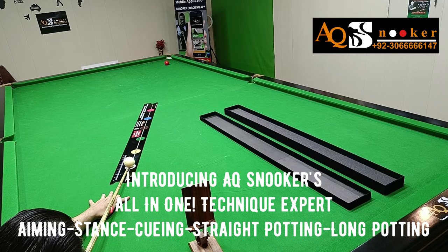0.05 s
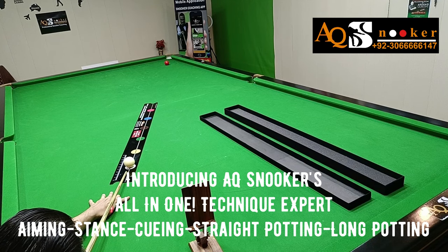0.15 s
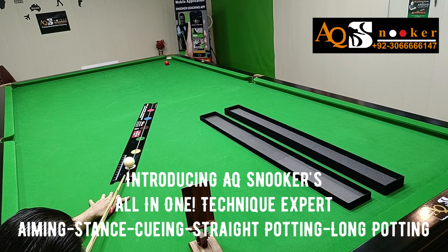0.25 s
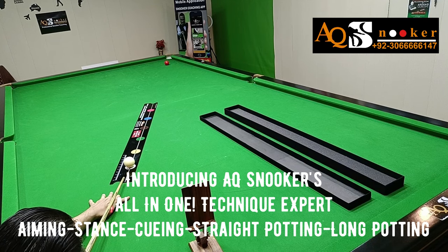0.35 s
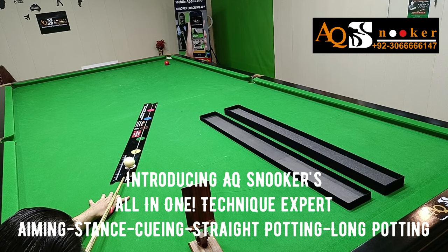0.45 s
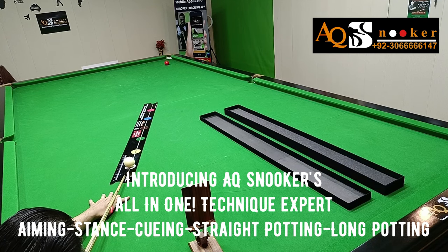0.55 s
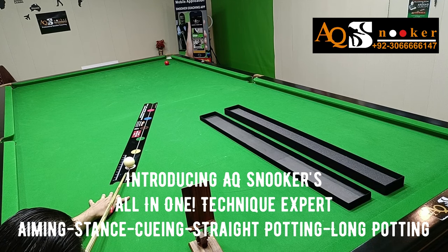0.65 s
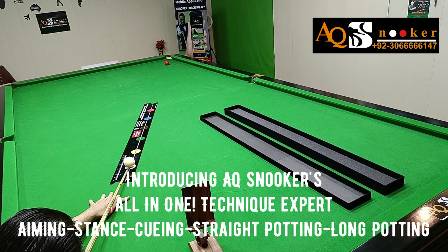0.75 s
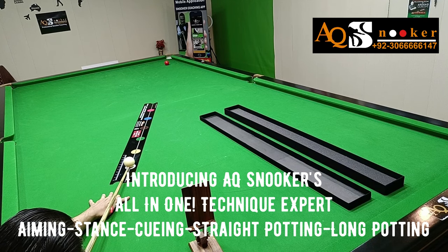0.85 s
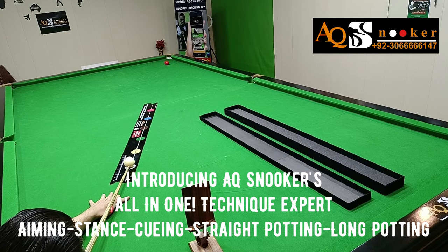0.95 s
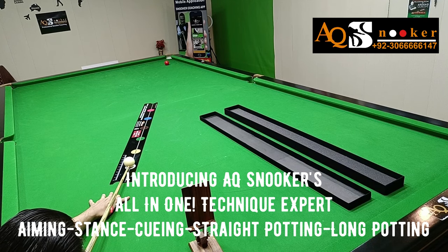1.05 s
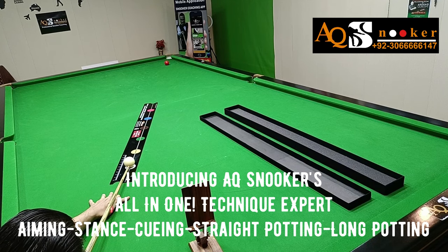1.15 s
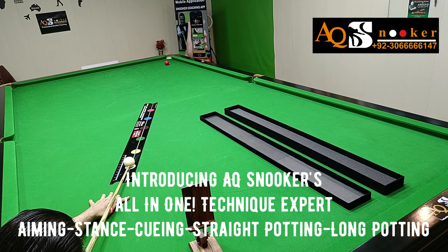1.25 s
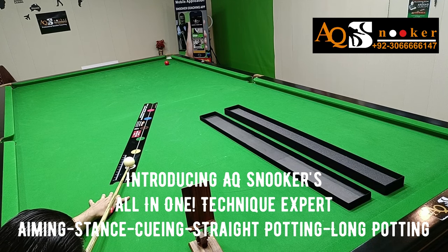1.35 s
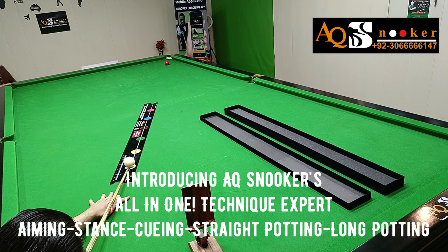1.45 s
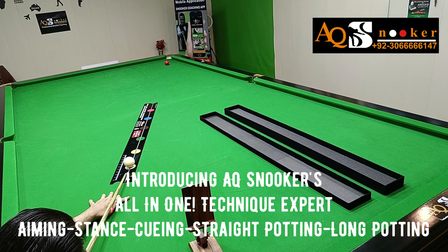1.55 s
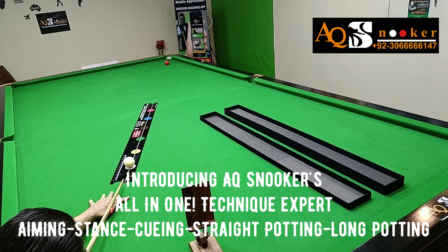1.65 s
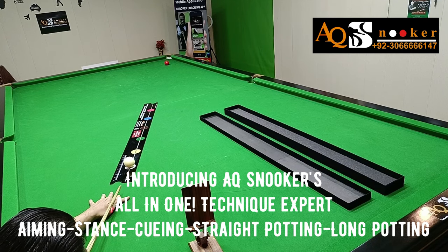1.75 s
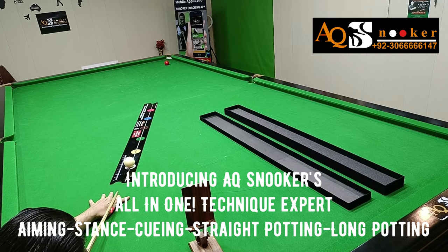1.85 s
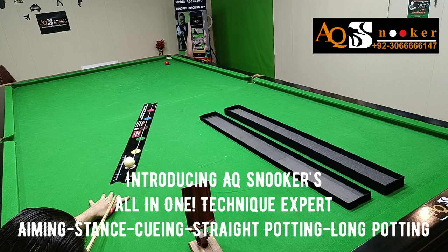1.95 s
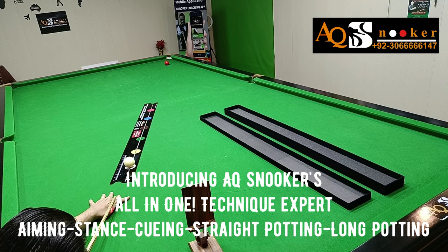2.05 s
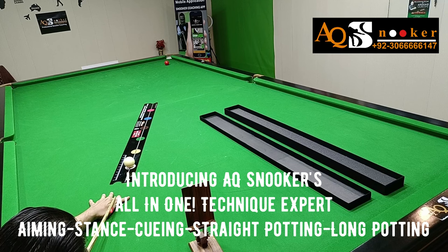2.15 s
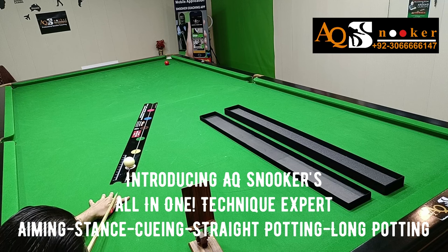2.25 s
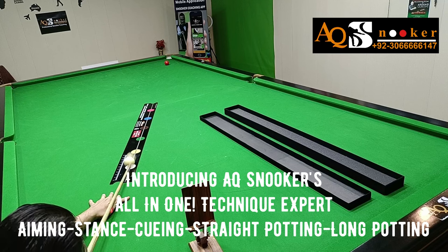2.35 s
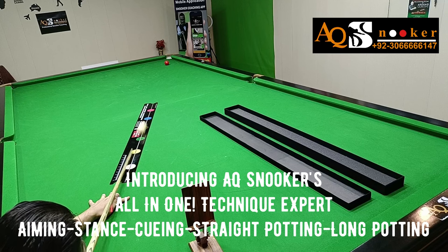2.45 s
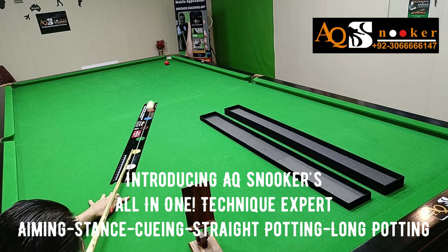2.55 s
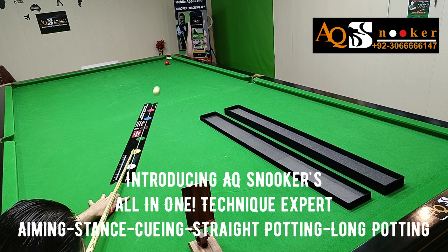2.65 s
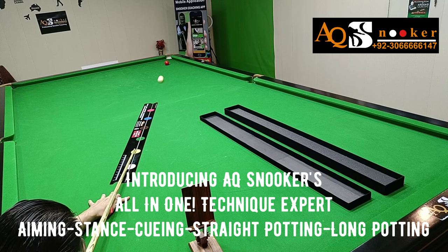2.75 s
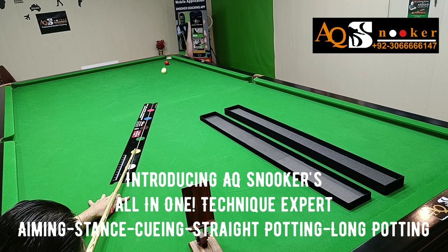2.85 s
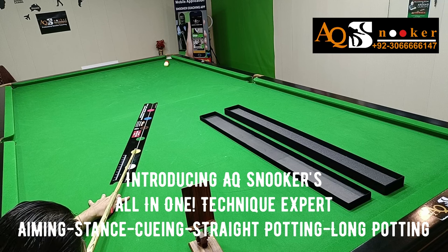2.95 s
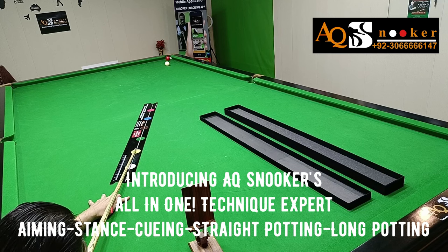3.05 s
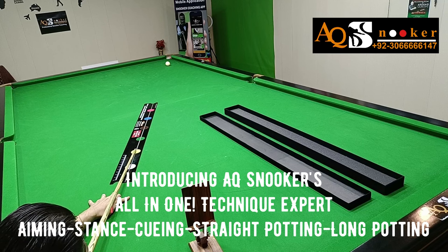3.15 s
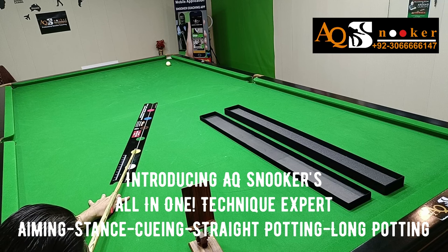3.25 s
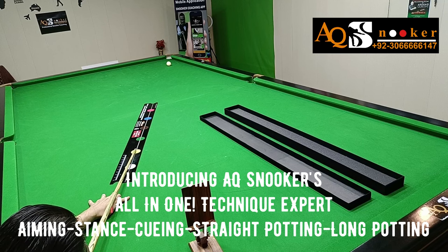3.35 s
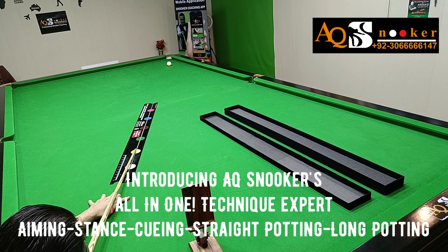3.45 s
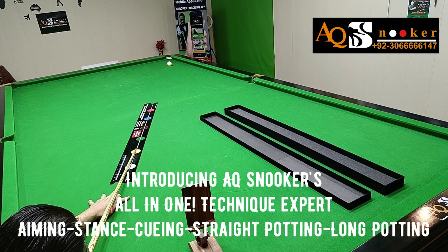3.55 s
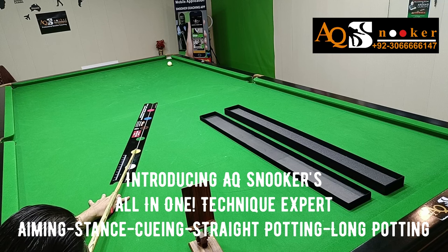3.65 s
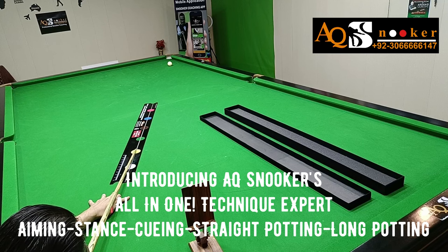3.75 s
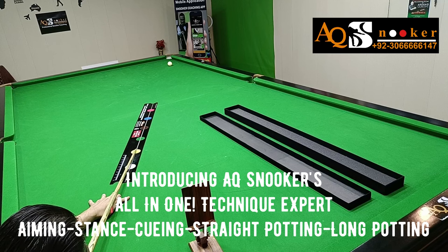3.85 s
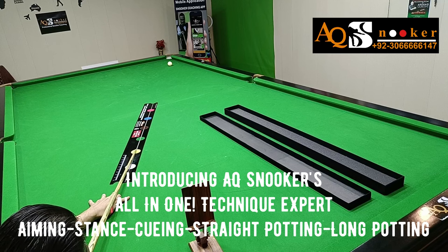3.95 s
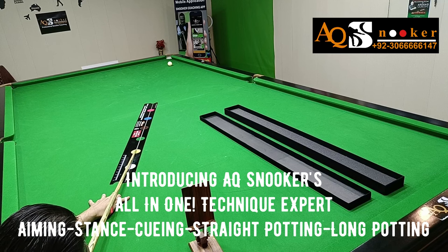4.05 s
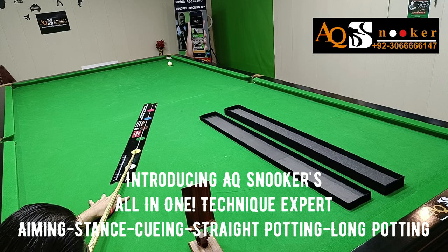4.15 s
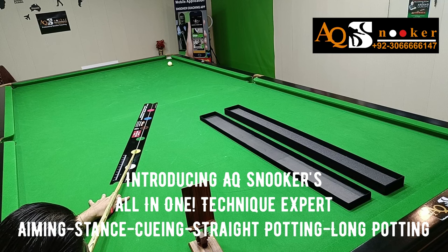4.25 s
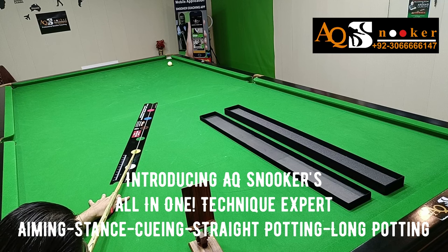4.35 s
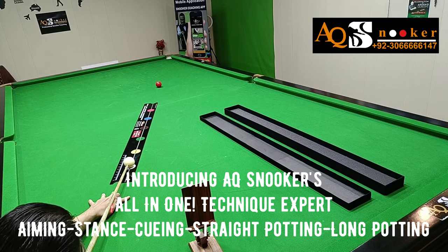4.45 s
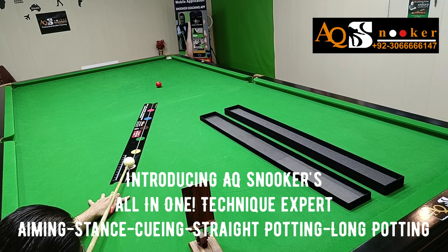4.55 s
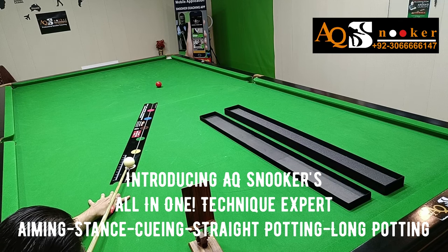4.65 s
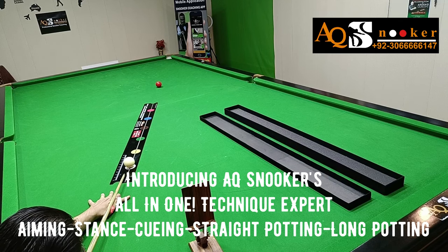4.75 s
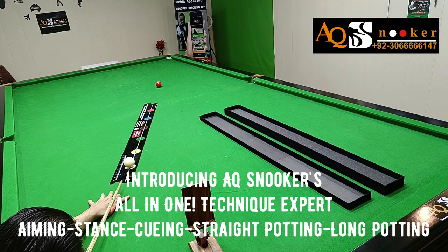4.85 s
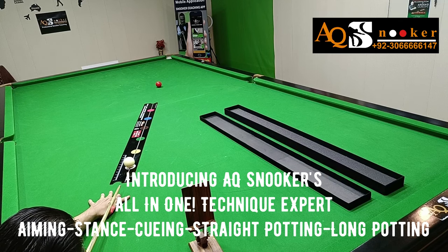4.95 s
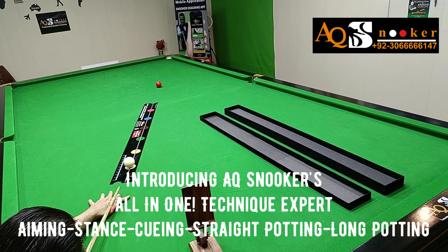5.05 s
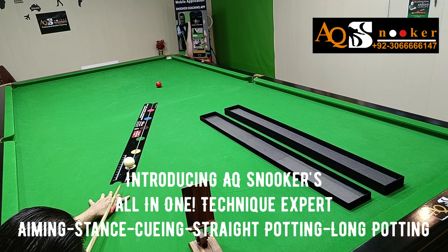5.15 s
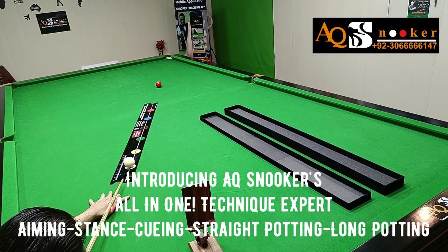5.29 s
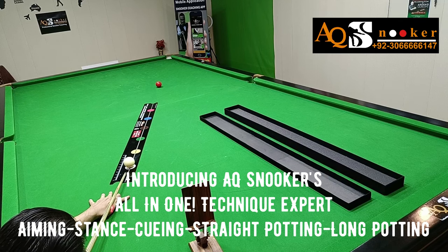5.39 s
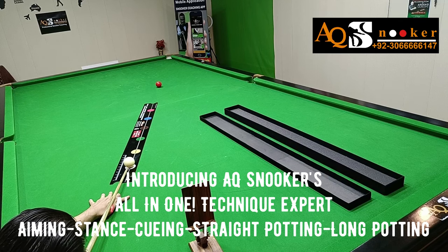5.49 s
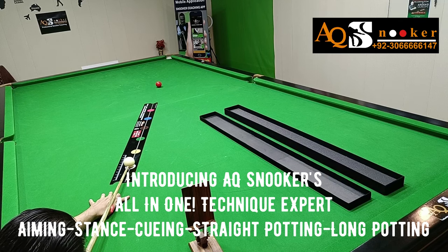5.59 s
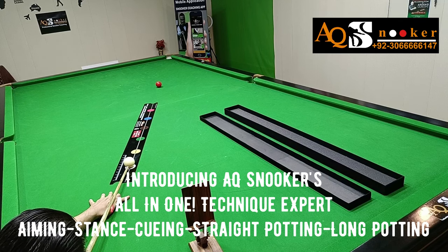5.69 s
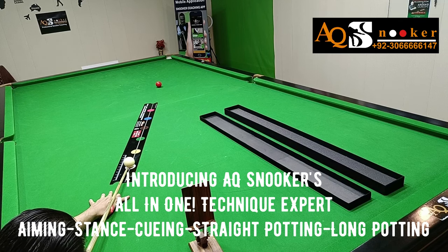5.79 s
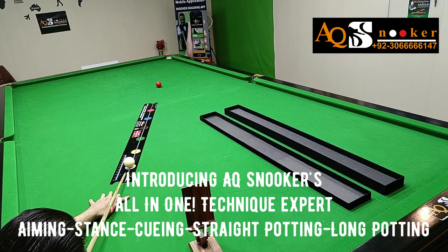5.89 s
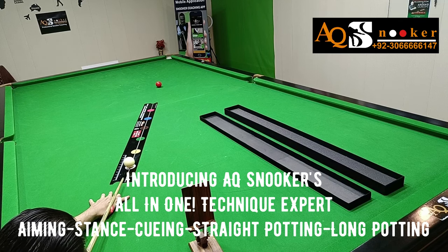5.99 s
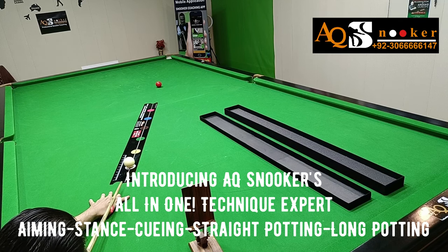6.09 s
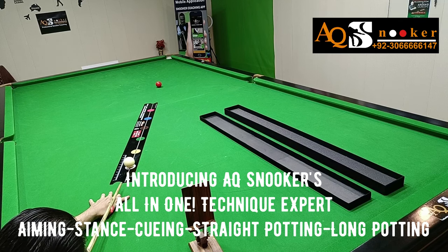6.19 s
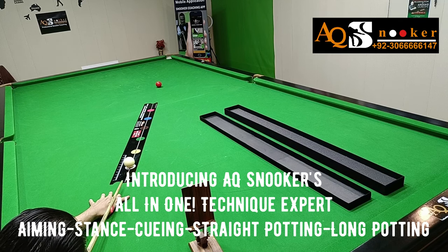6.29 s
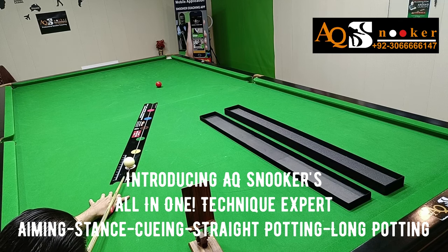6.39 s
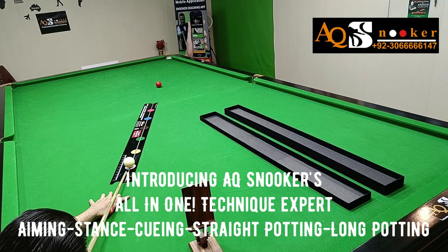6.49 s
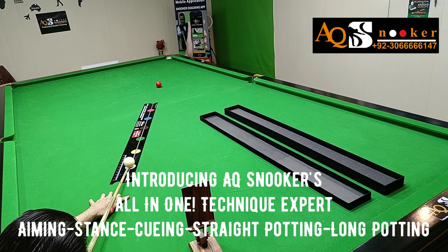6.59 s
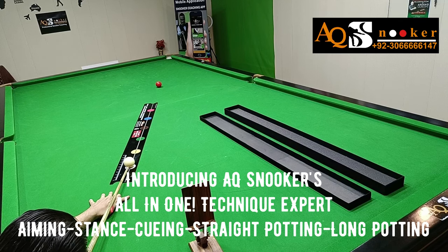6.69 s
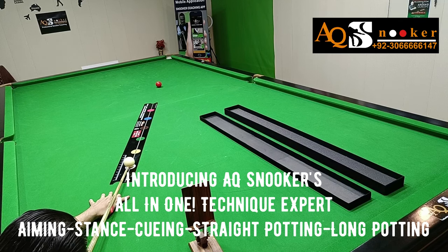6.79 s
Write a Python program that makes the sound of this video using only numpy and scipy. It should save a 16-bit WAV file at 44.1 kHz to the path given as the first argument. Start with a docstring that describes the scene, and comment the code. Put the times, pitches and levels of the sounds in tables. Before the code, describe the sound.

Steady ventilation rush and a wavering low hum fill a medium indoor room. After about two and a half seconds a cue tip cracks sharply on a ball, with a short soft sliding friction. Half a second later two balls meet with a hard bright clack, and the potted ball knocks rapidly in the pocket, growing duller. A small bright rustle, a very faint clack and tiny ticks follow. Stereo microphone close to the player.

```python
"""A cue strikes the white ball on a snooker table; it clacks against a far ball, which thuds into a pocket.
Blows are short shaped pulses plus dying modes, with early echoes and a room tail of sparse taps.
The cue's slide and a bright rustle are shaped noise; a few faint ticks follow.
Behind lie the ventilation's noise and a narrow band of low room noise near 90 Hz, made as a sine fluctuating
in level and pitch; two ports a few centimetres apart, with a limiter."""
import sys
import numpy as np
from scipy import signal
from scipy.fft import rfft, irfft
from scipy.io import wavfile
from scipy.ndimage import uniform_filter1d, minimum_filter1d

SR = 44100
rng = np.random.default_rng(int(sys.argv[2]) if len(sys.argv) > 2 else 0)


def file_out(sig):
    """Save sig as 16-bit WAV at sys.argv[1]."""
    # one column per channel
    cols = np.atleast_2d(sig).T
    # limit, then scale
    lim = np.clip(cols, -1, 1)
    pcm = np.round(lim * 32767).astype(np.int16)
    wavfile.write(sys.argv[1], SR, pcm)


N = 301109

# narrow band of low room noise, its uneven level: (time [s], level [dB])
LOW_NOISE_LEVEL = [(0.0, -37.5), (0.17, -39.5), (0.26, -49.5), (0.46, -36.5), (0.57, -51.5), (0.84, -36.5),
                   (1.25, -38.5), (1.31, -57), (1.43, -36), (1.81, -43.5), (1.82, -36), (3.69, -45),
                   (4.49, -35), (4.6, -54), (4.83, -37), (6.05, -40.5), (6.16, -33), (6.83, -41.5)]
# ventilation rush: (frequency [Hz], density [dB per Hz])
AIR_COLOUR = [(20, -36), (54, -17.5), (90, -12.5), (130, -13.5), (300, -17), (460, -21), (900, -23),
              (1400, -30.5), (2000, -27), (3400, -37.5), (6600, -47.5), (7500, -52), (10000, -62.5),
              (16000, -59.5)]
# duct resonances: (frequency [Hz], width [Hz], lift [dB])
DUCT_RESONANCES = [(59.3, 5.5, 2), (122, 6.2, 1.5), (176.2, 14.1, 13), (213.1, 12.7, 7), (233.7, 12.7, 9.5),
                   (280, 5.5, 4.5), (396.4, 19.6, 9), (431.6, 12, 8.5), (658.6, 37, 7), (1246, 15, 9)]
# left-right likeness of the ventilation: (frequency [Hz], likeness [0..1])
AIR_LIKENESS = [(30, .92), (60, .995), (110, .995), (200, .98), (400, .88), (800, .7), (2000, .5),
                (8000, .3)]
# left-right likeness of the room tail: (frequency [Hz], likeness [0..1])
TAIL_LIKENESS = [(100, 0.91), (300, 0.2), (600, 0.36), (1500, 0.091)]
# room decay: (frequency [Hz], t60 [s])
ROOM_T60 = [(200, 0.34), (500, 0.53), (1000, 0.48), (2500, 0.47), (5000, 0.37), (8000, 0.45), (16000, 0.14)]
# first echoes from cushions, lamp and walls: (delay [ms], extra delay on the right [ms], gain before echo_db)
FIRST_ECHOES = [(1.97, .07, .48), (7.66, -.47, .8), (8.25, 0, -.7), (8.91, .43, .77), (12.22, -1.06, .38),
                (13.29, .32, .6), (17.46, .14, .5), (18.87, .04, -.52), (24.13, -.75, -.42)]
# bright rustle: (frequency [Hz], density [dB per Hz])
RUSTLE_SPECTRUM = [(2000, -5.5), (3500, 0), (4500, 1), (6500, -1.5), (8000, -5.5), (10500, -13.5),
                   (13500, -3), (16000, -13)]
# cue sliding over the hand, ball skidding on the cloth: (time [s], level [dB])
SLIDE_LEVEL = [(2.38, -95), (2.45, -56), (2.53, -50), (2.55, -24), (2.65, -32), (2.7, -35), (2.75, -31.5),
               (2.8, -43.5), (2.88, -79)]
# the same friction: (frequency [Hz], density [dB per Hz])
SLIDE_SPECTRUM = [(290, -34), (500, -13), (740, -4.5), (1160, -7.5), (2390, -14), (2650, -14), (3860, -17),
                  (6330, -22.5), (7640, -34), (14200, -34.5), (16000, -33)]
# ticks: (time [s], strength [dB])
TICK_BLOWS = [(4.836, -36), (4.843, -39), (4.881, -50)]
# tick pulse: (frequency [Hz], density [dB per Hz])
TICK_COLOUR = [(3000, -40), (6000, -5), (9000, -11), (13000, 0), (16000, -6)]
# ball knocking in the pocket: (time [s], strength [dB])
POCKET_KNOCKS = [(3.3005, -25.5), (3.3045, 0), (3.3168, -4.5), (3.3445, -15.5), (3.356, -14.5),
                 (3.363, -11), (3.375, -8.5), (3.391, -11.5), (3.401, -14.5), (3.505, -21)]
# its crack: (frequency [Hz], density [dB per Hz])
POCKET_COLOUR = [(290, -53), (500, -24), (795, 9.5), (1050, 6.5), (1600, -1.5), (2610, -1), (3980, -10.5),
                 (4340, -13), (5800, -13.5), (7640, -35), (16000, -48)]
# pocket modes: (frequency [Hz], level before tilt [dB], t60 [s])
POCKET_MODES = [(304, -7.5, 0.047), (374, -3, 0.045), (432, -0.5, 0.053), (620, -11, .03),
                (792, -7.5, 0.044), (1044, -9, 0.038), (1395, -14, 0.026)]
# ball against ball: (time [s], strength [dB])
BALL_CLACKS = [(3.1446, 1.5), (3.961, -28.5)]
# its clack: (frequency [Hz], density [dB per Hz])
BALL_COLOUR = [(240, -35), (500, -25), (1000, -13.5), (1700, -5.5), (2600, 1.5), (4000, -10), (5000, -21.5),
               (6000, -44), (6700, -39), (9300, -54), (10700, -47), (14700, -40), (16000, -44)]
# cue knocks: (time [s], strength of the first touch [dB])
CUE_KNOCKS = [(2.5361, -4), (2.736, -23)]
# tip crack: (frequency [Hz], density [dB per Hz])
CUE_TIP_COLOUR = [(120, -60), (200, 3.5), (294, -8), (821, -1.5), (1270, -9), (1370, 4), (2020, -12),
                  (2210, -8), (2650, 11), (3130, -0.5), (6520, -11.5), (8120, -34), (16000, -54)]
# cue shaft modes: (frequency [Hz], level [dB], t60 [s])
CUE_SHAFT_MODES = [(490, -23, 0.027), (835, -21, 0.037), (1376, -17, .035), (1830, -17, .03),
                   (2244, -15, 0.053), (2660, -17, .04), (2880, -18, .03), (4300, -1, 0.007)]
# colour difference of the ports: (frequency [Hz], left minus right [dB])
PORT_LEAN = [(30, -4), (60, 1.5), (330, -.5), (1000, 0), (4200, 0), (6400, -10), (9800, 8.5), (13000, -4.5),
             (16000, -4)]

PORT_LAG_SAMPLES = 9  # the right port hears later
EDGE_HZ = 15900
LEAD_SAMPLES = 64  # of a pulse before its peak
AIR_RMS_DB = -37
LOW_NOISE_HZ, PITCH_SPREAD_RMS_HZ, LEVEL_SPREAD_RMS_DB = 90.7, 3.25, 3.0
CHATTER_S, CHATTER_LOSS_DB = .0006, 2  # rebound k comes k squared steps after the first touch, each weaker
FIRST_TOUCH_DB = -7  # the first touch rings more than it cracks
CONTACT_PER_DB = .004  # a weaker blow stays in contact longer
DULLING_DB_PER_S, SINKING_DB_PER_S = 80, 51  # as the ball sinks: weaker crack, less sound into the room
MUFFLING_DB_PER_S = 70  # as it sinks, modes fade per octave away from the main one
RUSTLE_S, RUSTLE_DB, RUSTLE_HOLD_S, RUSTLE_FADE_DB_PER_S = 3.629, -37, 0.018, 450


def gain_of(db):
    """Decibels to gain."""
    return 10 ** (np.asarray(db) / 20)


def evened(x):
    """Scales to rms 1."""
    return x / np.sqrt(np.mean(x ** 2) + 1e-20)


def read(points, hz):
    """Reads a spectrum on a log-frequency axis."""
    point_hz, value = np.transpose(points)
    return np.interp(np.log(hz + 1), np.log(point_hz + 1), value)


def panned(x, pan_db):
    """Sets left minus right level in dB."""
    return x * gain_of([[pan_db / 2], [-pan_db / 2]])


def fluctuation(t, low_hz, high_hz):
    """Random fluctuation of rms 1: sines of random phase, weaker upwards."""
    total = 0
    for hz in np.geomspace(low_hz, high_hz, 12):
        total = total + np.sin(2 * np.pi * (hz * t + rng.random())) / np.sqrt(hz)
    return evened(total)


def noise(colour_db, same, patchy_db, size):
    """Two-port noise of rms 1 with drifting patches; colour_db and same are functions of Hz."""
    hz, hop = np.fft.rfftfreq(size, 1 / SR), size // 4
    a, b, c, d, patches = rng.standard_normal((N // hop + 5, len(hz), 5)).T
    patches = uniform_filter1d(patches, size=size // 64, axis=0)  # over frequency
    patches = evened(uniform_filter1d(patches, size=6, axis=1))  # over time
    like = np.clip(same(hz), 0, 1)[:, None]
    lag = np.exp(-2j * np.pi * hz * PORT_LAG_SAMPLES / SR)[:, None]
    left = a + 1j * b
    right = lag * like * left + np.sqrt(1 - like ** 2) * (c + 1j * d)
    spectra = np.array([left, right]) * gain_of(colour_db(hz)[:, None] + patchy_db * patches)
    return evened(signal.istft(spectra, nperseg=size, noverlap=size - hop)[1][:, :N])


def ventilation():
    """A broad rush with the duct's resonances on it."""
    def colour_db(hz):
        lift_db = sum(db / (1 + (2 * (hz - f) / width) ** 2) for f, width, db in DUCT_RESONANCES)
        return read(AIR_COLOUR, hz) + lift_db
    return gain_of(AIR_RMS_DB) * noise(colour_db, lambda hz: read(AIR_LIKENESS, hz), patchy_db=0.44, size=4096)


def low_room_noise():
    """A narrow band of noise: a sine fluctuating at random in pitch and level, alike at both ports."""
    s, db = np.transpose(LOW_NOISE_LEVEL)
    t = np.arange(N) / SR
    turns = np.cumsum(LOW_NOISE_HZ + PITCH_SPREAD_RMS_HZ * fluctuation(t, .5, 8)) / SR
    level = gain_of(np.interp(t, s, db) + LEVEL_SPREAD_RMS_DB * fluctuation(t, 5, 20))
    band = np.sqrt(2) * level * np.sin(2 * np.pi * turns)
    return np.array([band, np.roll(band, PORT_LAG_SAMPLES)])


def tail(swell_s):
    """Sparse taps of random sign that swell over the first echoes; each band dies at its own speed."""
    taps = np.zeros((2, SR))
    at = np.arange(40, SR - 20, 20) + rng.integers(0, 20, (2, (SR - 41) // 20))
    np.put_along_axis(taps, at, rng.choice([-1., 1.], at.shape), 1)
    hz, t, spectra = signal.stft(taps, SR, nperseg=256)
    like = np.clip(read(TAIL_LIKENESS, hz), 0, 1)[:, None]  # long waves reach both ports alike
    spectra[1] = like * spectra[0] + np.sqrt(1 - like ** 2) * spectra[1]
    decay = gain_of(-60 * t / read(ROOM_T60, hz)[:, None])
    out = signal.istft(spectra * decay, SR, nperseg=256)[1][:, :SR]
    age_s = np.arange(SR) / SR
    out *= 1 - np.exp(-age_s / swell_s)
    out *= 1 + 2.0 * np.exp(-age_s / 0.012)  # near surfaces scatter more at first
    return out / np.linalg.norm(out, axis=1)[:, None]


def rubbing(curve, colour, room_db, pan_db):
    """Friction noise under a level curve, with the room's answer."""
    s, db = np.transpose(curve)
    level = gain_of(np.interp(np.arange(N) / SR, s, db, left=-150, right=-150))
    hiss = level * noise(lambda hz: read(colour, hz), lambda hz: 0.1 + 0 * hz, patchy_db=2.5, size=512)
    room = signal.fftconvolve(hiss, tail(swell_s=0.0031), axes=1)[:, :N]
    return panned(hiss + gain_of(room_db) * room, pan_db)


def rustle():
    """A bright rustle, perhaps the pocket net taking the ball: sudden, held briefly, fading."""
    held_s = RUSTLE_S + RUSTLE_HOLD_S
    curve = [(RUSTLE_S, RUSTLE_DB), (held_s, RUSTLE_DB), (held_s + 1, RUSTLE_DB - RUSTLE_FADE_DB_PER_S)]
    return rubbing(curve, RUSTLE_SPECTRUM, room_db=-1, pan_db=-1.0)


def slide():
    """Friction of the cue over the hand and of the ball on the cloth."""
    return rubbing(SLIDE_LEVEL, SLIDE_SPECTRUM, room_db=-4.5, pan_db=-0.5)


def pulse(colour, causal, contact):
    """A short pulse, peak 1; a longer contact lowers the spectrum; causal 0 is symmetric, 1 starts abruptly."""
    hz = abs(np.fft.fftfreq(4096, 1 / SR))
    log_gain = np.log(gain_of(read(colour, contact * hz)))
    phase = -causal * signal.hilbert(log_gain).imag  # minimum phase at causal 1
    wave = np.fft.ifft(np.exp(log_gain + 1j * phase)).real
    return np.roll(wave, LEAD_SAMPLES)[:1024] / abs(wave).max()


def ring(modes):
    """Dying sines of a struck object, rising over the contact; small bodies radiate no deep bass."""
    t = np.maximum(np.arange(SR // 4) - LEAD_SAMPLES, 0) / SR
    tones = 0 * t
    for hz, db, t60 in modes:
        tones += gain_of(db - 60 * t / t60) * np.sin(2 * np.pi * hz * t)
    tones *= 1 - np.exp(-t / 0.0008)
    return signal.sosfilt(signal.butter(6, 255, "high", fs=SR, output="sos"), tones)


def early_paths(echo_db, lag_samples):
    """Direct sound and first echoes as taps; the right port hears lag_samples later."""
    taps = np.zeros((2, SR // 10))
    taps[0, 0] = taps[1, lag_samples] = 1
    for ms, right_ms, gain in FIRST_ECHOES:
        taps[0, round(ms * SR / 1000)] += gain * gain_of(echo_db)
        taps[1, round((ms + right_ms) * SR / 1000) + lag_samples] += gain * gain_of(echo_db)
    return taps


def strike(blows, colour, modes, causal, echo_db, swell_s, pan_db, lag_samples):
    """Blows (s, dB, room dB, crack dB, tilt dB per octave) crack and ring, heard directly, by echoes and room."""
    direct, to_room = np.zeros((2, N))
    hardest_db = max(row[1] for row in blows)
    loudest_hz = max(modes, key=lambda mode: mode[1], default=[1])[0]
    for s, db, room_db, crack_db, tilt_db in blows:
        tilted = [(hz, level_db + tilt_db * abs(np.log2(hz / loudest_hz)), t60) for hz, level_db, t60 in modes]
        tones = ring(tilted)
        crack = pulse(colour, causal, 1 + CONTACT_PER_DB * (hardest_db - db))
        sound = -tones
        sound[:len(crack)] -= gain_of(crack_db) * crack
        start = round(s * SR) - LEAD_SAMPLES
        direct[start:start + len(sound)] += gain_of(db) * sound
        to_room[start:start + len(sound)] += gain_of(db + room_db) * sound
    early = signal.fftconvolve(direct[None], early_paths(echo_db, lag_samples), axes=1)[:, :N]
    late = signal.fftconvolve(to_room[None], tail(swell_s), axes=1)[:, :N]
    return panned(early + late, pan_db)


def ticks():
    """Faint bright ticks: abrupt pulses without modes."""
    blows = [(s, db, 0, 0, 0) for s, db in TICK_BLOWS]
    return strike(blows, TICK_COLOUR, [], causal=1, echo_db=-20, swell_s=.005, pan_db=-3.0, lag_samples=9)


def pocket(room_db, crack_db):
    """The ball knocks about in the pocket, duller and more enclosed as it sinks."""
    blows = []
    for s, db in POCKET_KNOCKS:
        sunk_s = s - POCKET_KNOCKS[0][0]
        blows.append((s, db, room_db - SINKING_DB_PER_S * sunk_s, crack_db - DULLING_DB_PER_S * sunk_s,
                      -MUFFLING_DB_PER_S * sunk_s))
    return strike(blows, POCKET_COLOUR, POCKET_MODES, causal=.7, echo_db=-10, swell_s=.012, pan_db=.4,
                  lag_samples=5)


def balls():
    """Ball against ball: nearly symmetric pulses without modes."""
    blows = [(s, db, 6, 0, 0) for s, db in BALL_CLACKS]
    return strike(blows, BALL_COLOUR, [], causal=.15, echo_db=0, swell_s=.025, pan_db=0, lag_samples=4)


def cue(room_db, crack_db, touches):
    """Each knock of the cue is a short chatter of the tip that rings the shaft."""
    blows = []
    for s, db in CUE_KNOCKS:
        for k in range(touches):
            touch_crack_db = crack_db + FIRST_TOUCH_DB * (k == 0)
            blows.append((s + CHATTER_S * k ** 2, db - CHATTER_LOSS_DB * k, room_db, touch_crack_db, 0))
    return strike(blows, CUE_TIP_COLOUR, CUE_SHAFT_MODES, causal=.7, echo_db=-14, swell_s=.003, pan_db=.4,
                  lag_samples=8)


def scene():
    """Room tone, rubbing and blows."""
    background = ventilation() + low_room_noise()
    friction = rustle() + slide()
    blows = ticks() + pocket(room_db=-3, crack_db=7) + balls() + cue(room_db=-1.0, crack_db=5.5, touches=5)
    return background + friction + blows


def record(dry):
    """Port colour; a limiter pulls loud blows down at once and lets go slowly; then the band limit."""
    lean = gain_of(read(PORT_LEAN, np.fft.rfftfreq(N, 1 / SR)) / 2)
    heard = irfft(rfft(dry) * [lean, 1 / lean], N)
    peak = -minimum_filter1d(-abs(heard).max(0), size=45)  # running maximum of both ports
    peak_db = 20 * np.log10(peak + 1e-9)
    recovery_db = np.arange(N) * 710.0 / SR  # 710 dB per s
    held_db = np.maximum.accumulate(peak_db + recovery_db) - recovery_db
    over_db = np.maximum(held_db + .1, 0)  # ceiling -0.1 dB
    limited = heard / gain_of(uniform_filter1d(over_db, size=22))
    band = signal.firwin(511, EDGE_HZ, window=("kaiser", 9), fs=SR)
    return signal.oaconvolve(limited, band[None], "same")


dry = scene()
out = record(dry)
file_out(out)
```